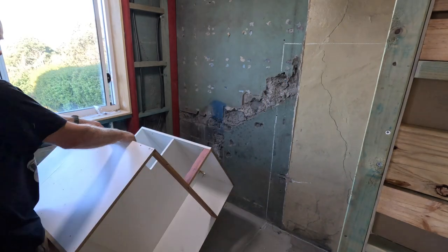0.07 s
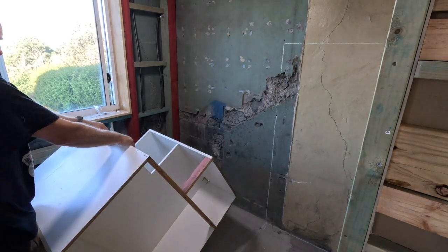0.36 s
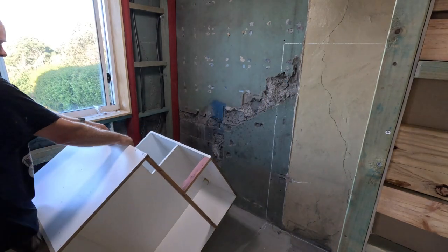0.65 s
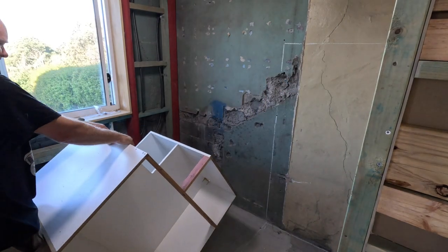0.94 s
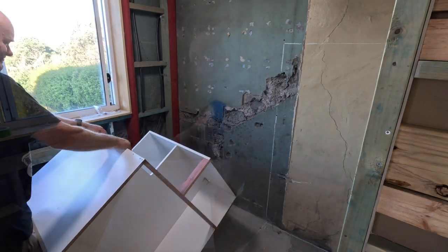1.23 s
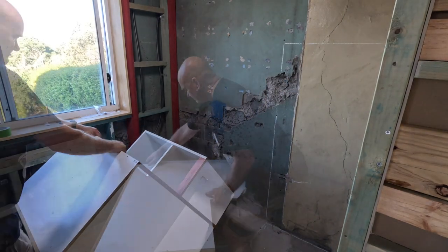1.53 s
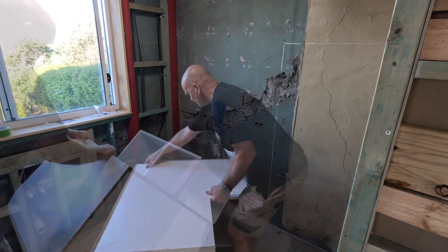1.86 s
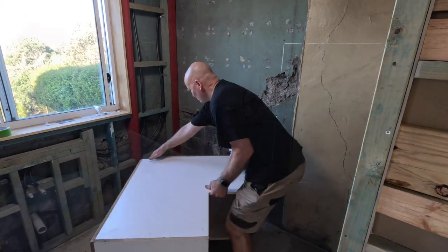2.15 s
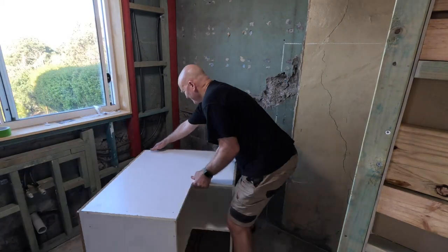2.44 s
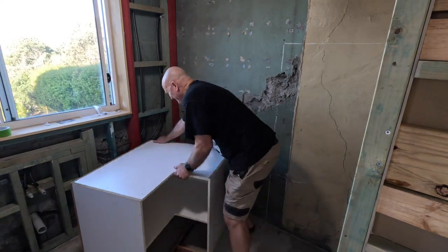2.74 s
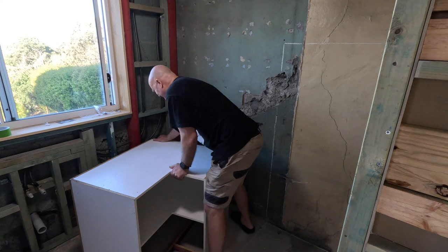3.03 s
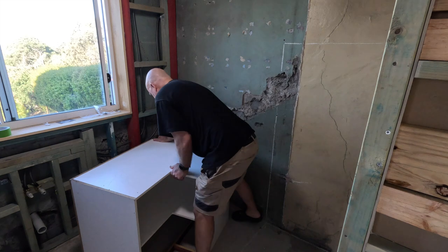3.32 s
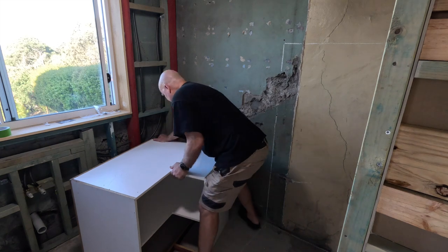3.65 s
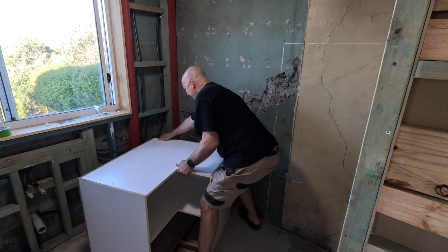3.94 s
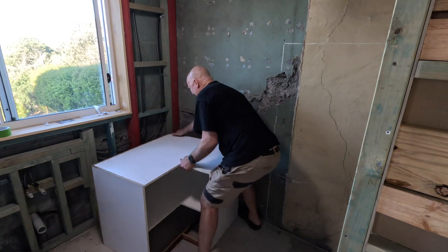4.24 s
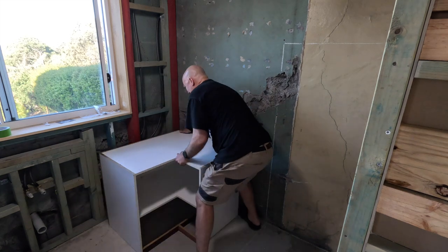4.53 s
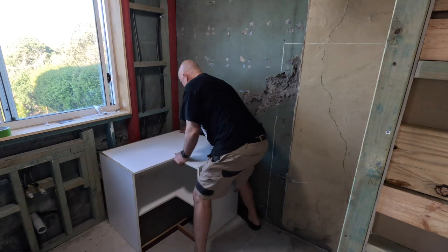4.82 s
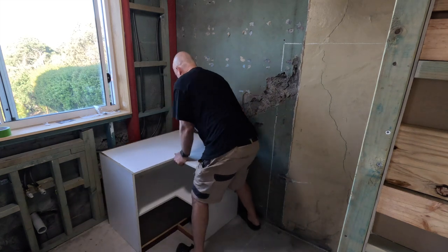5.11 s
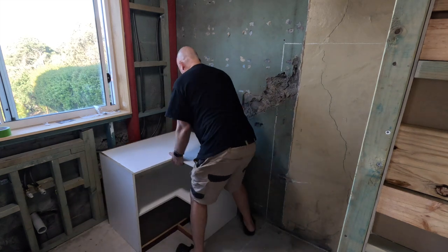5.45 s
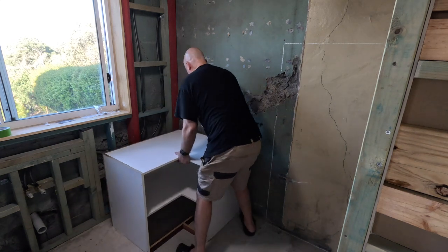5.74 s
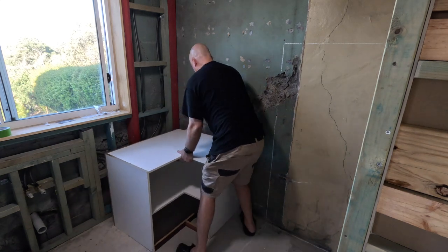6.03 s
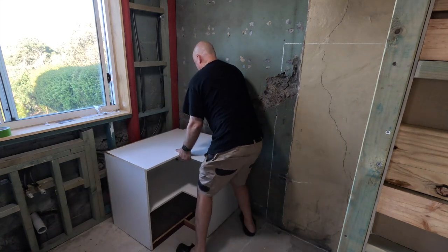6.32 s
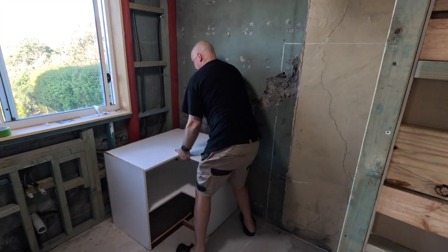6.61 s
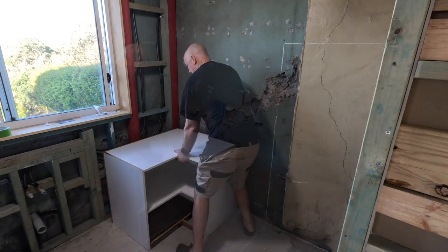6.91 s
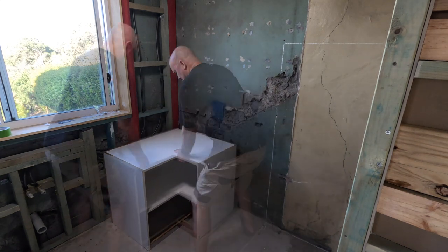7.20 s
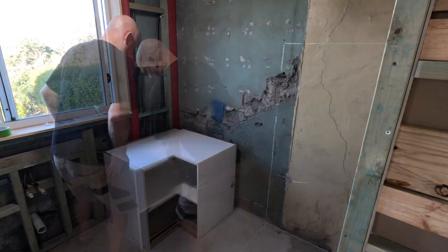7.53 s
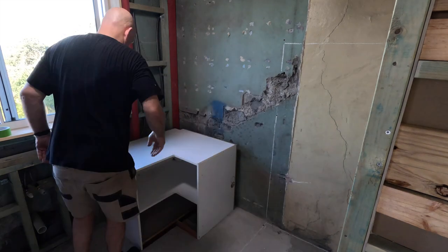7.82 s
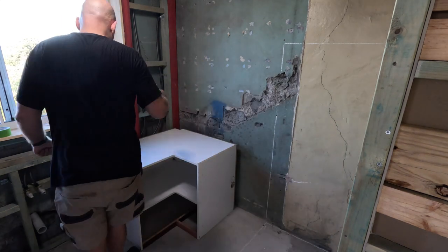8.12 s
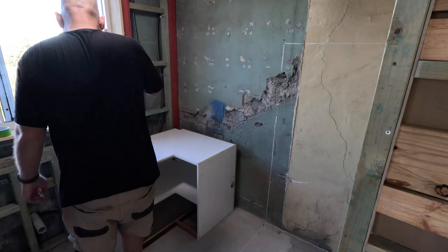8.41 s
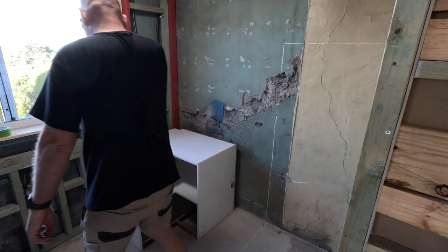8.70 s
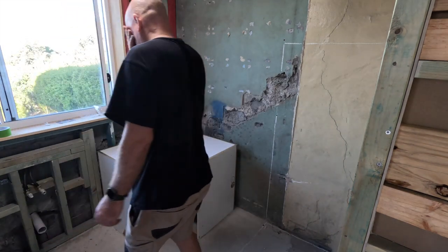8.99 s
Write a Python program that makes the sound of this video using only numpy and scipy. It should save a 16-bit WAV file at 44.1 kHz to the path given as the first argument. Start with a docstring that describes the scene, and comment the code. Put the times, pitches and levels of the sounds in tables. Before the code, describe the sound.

A chipboard cabinet bumps down onto a gritty floor after a loud shoe scrape. Four short shoves make it stick and slip with a low, droning judder and a rasp of crushed grit. It thumps against floor and wall, and nearby scuffing steps finish the sequence. The bare room adds a brief echo over quiet hiss and low rumble.

```python
"""In a bare room, over a faint rumble of air, shoes scuff on a dusty concrete floor.
Grit crunches and a chipboard cabinet is set down with a thud. It is shoved four times toward a corner:
its edges stick and slip, so the box judders, its panels drone and groan, and grit grinds underneath.
It bumps the floor and the wall. Finally the shoes scuff again and step close by."""
import sys
import numpy as np
from scipy import signal
from scipy.fft import rfft, irfft, next_fast_len
from scipy.io import wavfile
from scipy.ndimage import uniform_filter1d, minimum_filter1d, map_coordinates

SR = 44100
rng = np.random.default_rng(int(sys.argv[2]) if len(sys.argv) > 2 else 0)


def wav_out(sig):
    """Save sig, one row per channel (or a flat mono array), as 16-bit PCM at SR to the path in sys.argv[1]."""
    wavfile.write(sys.argv[1], SR, np.round(np.clip(np.atleast_2d(sig).T, -1, 1) * 32767).astype(np.int16))


N = 408366

# tone of the air's hiss: f/Hz, gain/dB
AIR_TONE = [(35, -49), (60, -12), (163, -6), (215, -11.5), (285, -11), (829, -18), (1630, -17), (1960, -22),
            (3340, -27.5), (7540, -34.5), (15500, -68.5)]
# tone of the low rumble: f/Hz, gain/dB
RUMBLE_TONE = [(12, -5), (23, -9.5), (31, 4), (40, -0.5), (52, -7.5), (66, -5.5), (110, -17.5),
               (160, -23.5), (270, -21.5), (500, -48.5), (900, -90)]
# how loud the rumble is: t/s, level/dB
RUMBLE_LEVEL = [(0.0, -42), (2.86, -44.5), (3.14, -60.5), (4.38, -42), (4.93, -59.5), (6.22, -43),
                (7.17, -53), (7.71, -38.5), (8.77, -37.5), (9.26, -38)]
# a sole slides: peak t/s, rise/s, fall/s, rub level/dB, fine grit over rub/dB, hollow f/Hz, hollow share
SCUFFS = [ (.05, 0.1442, 0.2707, -52, 12.5, 1292, 0.68), (0.221, 0.153, 0.11599, -21.5, -2, 1312, 0.52),
          (.63, 0.1516, 0.1922, -59, 1.5, 1299, 0.14), (1.06, 0.08595, 0.0931, -58, 4.5, 1298, 0.09),
          (1.199, 0.0862, 0.1478, -30.5, -0.5, 730, 0.36), (1.28, 0.1016, 0.10806, -30.5, 1.5, 1201, 0.1),
          (1.385, 0.03933, 0.07543, -37, 0, 1311, 0), (1.519, 0.07252, 0.08012, -38.5, 1.5, 1483, 0.35),
          (1.68, 0.0741, 0.1807, -45, -7, 1329, 0.1), (3.143, 0.04346, 0.08758, -41, -5.5, 869.6, 0.47),
          (3.28, 0.09125, 0.17484, -56, 2, 1000, 0.1), (3.56, 0.1856, 0.908, -55, -6, 1098, 0.29),
          (5.34, 0.12736, 0.13028, -44.5, -2.5, 1530, .4), (7.1, 0.1254, 0.66, -60.5, 6.5, 1300, 0.87),
          (7.3, 0.08305, 0.1394, -49, -4, 1210, 0.05), (7.54, 0.15, 0.04074, -48, -13, 1311, 0.06),
          (7.639, 0.2429, 0.2157, -50.5, 6.5, 1401, 0.25), (7.98, 0.5247, 0.4476, -50.5, -5.5, 1299, 0.09),
          (8.091, 0.06079, 0.2276, -36.5, -3, 1278, 0.73), (8.333, 0.05011, 0.11317, -28, 3, 893.5, 0.19),
          (8.431, 0.1014, 0.1797, -25.5, -10, 985.1, 0.81),
          (8.51, 0.0297, 0.08744, -34.5, -25.5, 876.4, 0.69),
          (8.776, 0.0554, 0.10838, -34, 2.5, 1237, 0.77), (9.02, 0.2441, 0.2569, -46.5, 4.5, 1203, 0.57),
          (9.089, 0.0351, 0.06385, -35, -6.5, 1104, 0.9), ]
# tone of dust under a sole: f/Hz, gain/dB
SOLE_TONE = [(120, -34.5), (200, -11.5), (240, -9.5), (298, -3), (371, -9.5), (506, -8), (641, -6),
             (742, -7.5), (1130, -2.5), (1590, -4), (2900, -5), (6130, -13), (7620, -12), (15500, -55)]
# an edge catches on grit: t/s, level/dB, centre f/Hz, width/Hz, length/s
CRUNCHES = [(0.725, -45.5, 1079, 1600, 0.08592), (1.375, -34, 3364, 3001, 0.01171),
            (1.675, -46, 1219, 160, 0.0379), (1.952, -35.5, 1599, 1500, 0.03),
            (2.099, -27.5, 2735, 1343, 0.15687), (2.32, -33.5, 2096, 2198, 0.02143),
            (2.459, -29, 1504, 1750, 0.02119), (3.118, -44.5, 2400, 2500, 0.04),
            (3.517, -52.5, 2928, 2530, 0.01141), (3.974, -30, 882, 299.4, 0.03223),
            (4.029, -38, 6990, 3500, 0.0693), (4.158, -31.5, 1240, 248.1, 0.02128),
            (4.873, -55.5, 2997, 2480, 0.03292), (5.017, -46, 1279, 802, 0.0334),
            (5.566, -41, 3246, 3509, 0.01441), (5.592, -40, 1687, 700, 0.0151),
            (5.813, -32.5, 2100, 1800, 0.05404), (5.911, -35, 4000, 4493, 0.091),
            (6.328, -39, 2000, 1483, 0.03), (6.723, -50.5, 3200, 5500, 0.08553),
            (7.051, -53.5, 2935, 3043, 0.02312), (7.274, -42.5, 1335, 450, 0.02529),
            (8.06, -33.5, 2392, 2444, 0.06056), (8.082, -27, 4646, 3533, 0.03504),
            (8.302, -31, 2995, 3497, 0.0353), (8.63, -51.5, 2917, 150, 0.0653),
            (8.728, -44, 3506, 2988, 0.03313), (8.945, -40, 2175, 1800, 0.02023)]
# dull blows on the box and heel falls: t/s, level/dB, hardness/dB
BUMPS = [(.731, -13.5, -5.5), (.755, -12.5, -27), (.789, -24, -24.5), (1.265, -18, -22), (1.284, -18, -0.5),
         (1.369, -28, 10.5), (1.504, -24.5, -8), (1.961, -24.5, -2.5), (2.226, -12.5, -5),
         (2.799, -17.5, -12.5), (5.018, -44, 11), (5.297, -33.5, -24), (5.51, -24, -5), (5.973, -8, -8.5),
         (5.998, -14, -0.5), (6.33, -25.5, 7), (6.699, -25.5, -32.5), (6.734, -12, -9), (6.758, -15, -17),
         (7.314, -33.5, 5), (7.54, -34.5, 6.5), (8.062, -30.5, 5)]
# the notes at which the box, its panels and the room's low boom ring: f/Hz, width/Hz, gain/dB
RINGING_NOTES = [(49.958, 19.435, -4.5), (66.475, 8.485, 4.5), (96.797, 4.878, -1), (103.39, 5.666, 2),
                 (146.89, 14.324, -3), (177.97, 11.007, -5), (206.22, 7.771, -3.5), (242.76, 16.323, -3),
                 (269.63, 11.19, -0.5), (314.41, 8.242, -7), (341.98, 5.417, -7.5), (372.24, 16.21, -8),
                 (412.19, 9.58, -11.5), (471.81, 8.67, -12.5), (555.4, 12.62, -15.5), (588.84, 14.56, -19),
                 (674.42, 19.41, -17), (779.97, 20.82, -17.5), (966.7, 86.02, -17.5),
                 (1088.9, 45.51, -13.5), (1419.4, 86.6, -24.5), (1503.5, 11, -20), (1780.2, 240, -23),
                 (2804.5, 41, -28), (3100.8, 87, -36.5)]
# one list for each shove: t/s, judder level/dB, drone level/dB, grinding level/dB
SHOVES = [
    [(1.91, -35.5, -44.5, -40.5), (1.94, -43.5, -41, -37), (1.97, -27, -26.5, -29),
     (2.014, -43, -31.5, -39), (2.07, -35, -32.5, -39), (2.118, -24.5, -23.5, -29),
     (2.174, -14.5, -25, -25), (2.26, -19.5, -29.5, -32.5), (2.298, -29, -34, -38),
     (2.364, -20.5, -30.5, -29.5), (2.42, -37.5, -37, -39.5)],
    [(2.48, -28, -28, -32.5), (2.494, -32, -31.5, -32), (2.528, -28, -27.5, -37.5), (2.55, -35, -32, -31),
     (2.628, -15, -29, -27.5), (2.692, -20.5, -30.5, -33), (2.77, -19.5, -27, -24.5),
     (2.808, -18.5, -31.5, -29), (2.844, -36, -27.5, -31.5), (2.884, -19.5, -31, -32),
     (2.92, -25, -33.5, -38.5)],
    [(3.76, -35.5, -43.5, -40.5), (3.782, -43, -39, -44), (3.812, -46, -36, -41.5),
     (3.866, -22.5, -35, -30), (3.92, -33, -29.5, -35.5), (3.98, -27, -29.5, -33.5),
     (4.006, -30.5, -25, -31), (4.262, -18, -32, -39), (4.602, -18, -28.5, -37), (4.654, -25, -37.5, -39),
     (4.68, -26.5, -38, -46)],
    [(5.6, -34, -37.5, -35), (5.626, -36, -37, -43), (5.686, -25.5, -37.5, -41), (5.86, -25, -25.5, -29),
     (5.886, -18, -23.5, -31.5), (5.914, -28.5, -26, -26), (6.008, -20.5, -25.5, -38),
     (6.18, -24.5, -45, -44.5), (6.27, -50, -43, -43), (6.344, -23.5, -38.5, -41.5), (6.36, -27, -45, -47)],
]
# how much the dust hisses in each shove, at the usual grinding level: level/dB
DUST_LEVELS = [-37.5, -39.5, -37, -36.5]
# how often the bottom edge slips: t/s, rate/Hz
SLIP_RATE = [(1.9, 82.43), (2.12, 98.94), (2.5, 90.206), (2.6, 69.64), (2.75, 54.31), (2.9, 83.6),
             (4.15, 73.464), (4.48, 70), (4.6, 71.332), (5.92, 98.917), (6.08, 66)]
# tone of grit crushed under the edge: f/Hz, gain/dB
GRIND_TONE = [(240, -46.5), (400, 8.5), (511, -6), (577, -3.5), (715, -8.5), (1020, -4.5), (1130, -5),
              (1240, -3), (1320, -5.5), (3510, -14.5), (4630, -20), (7210, -22), (15500, -59.5)]
# a panel groans: start t/s, length/s, f/Hz, level/dB, octave over the main note/dB
GROANS = [(1.929, 0.35645, 272, -27.5, -18), (2.119, 0.3646, 272.6, -35, -2.5),
          (2.171, 0.157, 312.8, -36.5, -21.5), (2.57, 0.3856, 295.9, -42.5, 4),
          (2.718, 0.11238, 255.8, -28, -20), (3.752, 0.073, 275, -36.5, -28.5),
          (3.88, 0.23, 265.4, -31.5, -27), (4.1, 0.25665, 275, -35.5, -20)]
# how long the echo takes to fade by 60 dB: f/Hz, time/s
ECHO_TIME = [(150, 0.0017), (500, 0.3233), (1100, 0.2858), (3000, 0.3838), (8000, 0.1964), (14000, 0.3094)]
# tone of the echo: f/Hz, gain/dB
ECHO_TONE = [(100, -3.5), (250, -10), (600, 3), (3000, 1.5), (12000, 3)]
# how wide the echo is: f/Hz, side over middle/dB
ECHO_WIDTH = [(100, -62.5), (300, -5.5), (640, -9), (1400, -5), (3000, -1.5), (5000, -8), (7500, -12),
              (12000, 4.5)]
# how far the sound leans left: f/Hz, left over right/dB
LEFT_LEAN = [(200, 0), (700, 1), (1300, 1.5), (2400, 1.2), (4400, .5), (8100, .8), (13000, 6)]


def amp(db):
    return 10 ** (np.asarray(db) / 20)


def unit(x):
    """Scale x to an average strength (rms) of 1."""
    return x / np.sqrt(np.mean(x ** 2) + 1e-20)


def even(x, size=3000):
    """Hold the strength of x near 1 all the way through."""
    return x / np.sqrt(np.abs(uniform_filter1d(x ** 2, size)) + 1e-6 * np.mean(x ** 2))


def along(points, hz):
    """Read a table by pitch, on a log scale."""
    f, v = np.transpose(points)
    return np.interp(np.log(hz + 1), np.log(f + 1), v)


def curve(rows):
    """One value per sample from rows of time and value."""
    return np.interp(np.arange(N) / SR, *np.transpose(rows))


def wobble(per_s):
    """A smooth curve through per_s random points a second."""
    return map_coordinates(rng.standard_normal(int(N * per_s / SR) + 4), [np.arange(N) * per_s / SR])


def filtered(x, response):
    """Multiply each frequency f in x by response(f)."""
    n = x.shape[-1]
    m = next_fast_len(n + SR // 2)
    return irfft(rfft(x, m) * response(np.fft.rfftfreq(m, 1 / SR)), m)[..., :n]


def toned(x, tone):
    """Shape x with a tone table."""
    return filtered(x, lambda f: amp(along(tone, f)))


def band(x, low_hz, high_hz, order=3):
    """Keep what lies between two frequencies."""
    return signal.sosfilt(signal.butter(order, [low_hz, high_hz], "band", fs=SR, output="sos"), x)


def resonance(f, hz, width):
    """The response of something that rings at hz."""
    return 1j * f * width / (hz * hz - f * f + 1j * f * width)


def air():
    """The room's air hisses quietly over a slowly swelling rumble."""
    both, left, right = toned(rng.standard_normal((3, N)), AIR_TONE)
    hiss = unit(both + .5 * np.array([left, right]))
    rumble = even(toned(rng.standard_normal(N), RUMBLE_TONE), size=9000)
    return amp(-57.5) * hiss + amp(curve(RUMBLE_LEVEL)) * rumble


def grit(per_s, spread_db, clump_db):
    """Grains break with tiny clicks of random size that come in clumps."""
    hits = rng.random(N) < per_s / SR
    clicks = hits * rng.standard_normal(N)
    return unit(clicks * amp(spread_db * rng.standard_normal(N) + clump_db * wobble(90)))


def scuffs():
    """How strong the rub and the fine grit are as each scuff swells and fades."""
    drop_db, roundness = 20, 1.2512  # drop over one rise or fall time; shape of the peak
    t = np.arange(N) / SR
    gains = np.zeros((2, N))
    for peak, rise, fall, db, fine_db, _, _ in SCUFFS:
        near = np.abs(t - peak) < 1
        away = np.maximum((peak - t[near]) / rise, (t[near] - peak) / fall)
        swell = amp(-drop_db * away ** roundness)
        gains[:, near] = np.hypot(gains[:, near], amp([[db], [db + fine_db]]) * swell)
    return gains


def shoes():
    """Soles rub over dust; the hollow under them colours the rub as the foot rolls."""
    def dust():
        return toned(grit(per_s=12000, spread_db=1.413, clump_db=1), SOLE_TONE)

    rubbing, fine = scuffs()
    times, *_, hollow_hz, shares = np.transpose(SCUFFS)
    pitch, share = curve(np.c_[times, hollow_hz]), curve(np.c_[times, shares])
    hollow = 0
    for hz in 630 * 2 ** (np.arange(5) / 3):  # blend five bands to follow the hollow's pitch
        nearness = np.sqrt(np.maximum(0, 1 - 3 * np.abs(np.log2(pitch / hz))))
        hollow += nearness * unit(filtered(dust(), lambda f: resonance(f, hz, width=499.3) ** 2))
    plain = unit(band(dust(), 158.94, 2066, order=2))
    rub = np.sqrt(share) * hollow + np.sqrt(1 - share) * plain
    return rubbing * rub + fine * unit(band(dust(), 1985.1, 20000, order=2))


def crunches():
    """Grit breaks in short bursts; a narrow band of pitch makes one creak or ping."""
    out, t = np.zeros(N + SR), np.arange(SR // 3) / SR
    for start, db, hz, width, length in CRUNCHES:
        grains = rng.standard_normal(len(t)) * amp(3.822 * rng.standard_normal(len(t)))
        burst = unit(filtered(grains, lambda f: resonance(f, hz, width) / (1 + (f / 8500) ** 8)))
        fade = np.exp(-(t / length) ** 2)
        out[round(start * SR):][:len(t)] += amp(db) * burst * fade
    return out[:N]


def ringing(force):
    """A force sets the box, its panels and the room's low boom ringing."""
    return filtered(force, lambda f: sum((-1) ** k * amp(db) * resonance(f, hz, width)
                                         for k, (hz, width, db) in enumerate(RINGING_NOTES)))


def bumps():
    """Padded blows rattle the joints and rock the box; harder ones bring out higher panel notes."""
    push_s, rattle_s, rocking_s = 0.0008499, 0.02649, 0.09828  # fading times
    out, t = np.zeros(N + SR), np.arange(SR // 2) / SR
    for start, db, hard_db in BUMPS:
        push = t / 0.0020257 * np.exp(-t / push_s)
        rattle = rng.standard_normal(len(t)) * np.exp(-t / rattle_s)
        rocking = band(rng.standard_normal(len(t)), 60.82, 145.43, order=2) * np.exp(-t / rocking_s)
        ring = ringing(push + 0.16254 * rattle + 0.16114 * rocking)
        thud, knock = band(ring, 52.6, 206.78, order=1), band(ring, 231.74, 3400, order=2)
        blow = thud / np.abs(thud).max() + amp(hard_db - 5.5) * knock / np.abs(knock).max()
        out[round(start * SR):][:len(t)] += amp(db) * blow
    return out[:N]


def shoves():
    """How strong judder, drone, grinding and hiss are; harder grinding makes more dust hiss."""
    grip_db_per_s, stop_db_per_s = 318, 160.5  # a shove takes hold quickly, then dies away
    usual_grinding_db, hiss_growth = -32, 1.0674
    t = np.arange(N) / SR
    gains = 0
    for rows, dust_db in zip(SHOVES, DUST_LEVELS):
        times, *levels = np.transpose(rows)
        judder, drone, grinding = [np.interp(t, times, level) for level in levels]
        hiss = dust_db + hiss_growth * (grinding - usual_grinding_db)
        before, after = np.maximum(0, times[0] - t), np.maximum(0, t - times[-1])
        fade_db = grip_db_per_s * before + stop_db_per_s * after
        gains = np.maximum(gains, amp(np.array([judder, drone, grinding, hiss]) - fade_db))
    return gains


def slips(scatter):
    """One pulse each time the edge lets go, at uneven gaps."""
    cycles = np.cumsum(curve(SLIP_RATE) * np.exp(scatter * wobble(70))) / SR
    return np.diff(np.floor(cycles), prepend=0) * amp(5.656 * wobble(45))


def squeaks(per_s, low_hz, high_hz, life_s):
    """Trapped grains briefly sing as they are dragged along."""
    out, t = np.zeros(N + SR), np.arange(SR // 8) / SR
    swell = t / life_s * np.exp(-(t / life_s) ** 2)
    for at, pitch, size, glide in rng.random((int(per_s * N / SR), 4)):
        hz = low_hz * (high_hz / low_hz) ** pitch * np.exp(4 * (glide - .5) * t)
        out[int(at * N):][:len(t)] += amp(4.56 * size) * swell * np.sin(2 * np.pi * np.cumsum(hz) / SR)
    return unit(out[:N])


def sliding():
    """Slips shake the box; grit crushed under the edge rings the panels, squeaks and hisses."""
    judder, drone, grinding, hiss = shoves()
    pulses = slips(scatter=.12)
    boom = even(band(ringing(pulses), 47.68, 129.78))
    shaking = unit(pulses) + grit(per_s=2500, spread_db=0.863, clump_db=0.998)
    panels = even(band(ringing(shaking), 196.15, 574.75))
    # grit breaks most just after each slip
    after_slip = unit(signal.lfilter([1], [1, -np.exp(-1 / (0.0243 * SR))], np.sqrt(pulses)))
    force = (1 + .5 * after_slip) * grit(per_s=3500, spread_db=0.6667, clump_db=1.7)
    crush = toned(force, GRIND_TONE)
    ring = unit(band(ringing(force), 547.14, 3383))
    squeal = squeaks(per_s=60, low_hz=755.04, high_hz=1890.9, life_s=0.017317)
    rasp = 0.8936 * unit(band(crush, 546.05, 2359)) + 0.2847 * ring + 0.3954 * squeal
    dust = unit(band(crush, 2153.1, 15000))
    return judder * boom + drone * panels + grinding * rasp + hiss * dust


def groans():
    """A panel falls in step with the slipping edge and sings a wavering note with its octave."""
    waver, flutter_db = 0.013092, 3.6248  # how unsteady pitch and level are
    out = np.zeros(N + SR)
    for start, length, hz, db, octave_db in GROANS:
        size = round(length * SR)
        phase = 2 * np.pi * np.cumsum(hz * (1 + waver * wobble(41.312)[:size])) / SR
        note = np.sqrt(2) * (np.sin(phase) + amp(octave_db) * np.sin(2 * phase))
        swell = np.sqrt(np.hanning(size)) * amp(db + flutter_db * wobble(29.74)[:size])
        out[round(start * SR):][:size] += swell * note
    return out[:N]


def room(x, count=90):
    """Bare walls add a dense echo that keeps changing as the sources move; its bass stays centred."""
    direct_db, echo_gain, delay_s = -1.2837, 0.47868, .002
    hz, t, noise = signal.stft(rng.standard_normal((count, 2, SR // 3)), SR, nperseg=256)
    fade = amp(-60 * t / along(ECHO_TIME, hz)[:, None])
    _, tails = signal.istft(noise * fade, SR, nperseg=256)
    echo, hop = np.zeros((2, N + 2 * SR)), N // (count - 1) + 1
    for k, tail in enumerate(tails):  # each overlapping piece of sound gets its own echo
        n = np.arange(max(0, (k - 1) * hop), min(N, (k + 1) * hop))
        piece = x[n] * np.cos(np.pi / 2 * (n / hop - k))
        answer = signal.fftconvolve(piece[None], tail / np.linalg.norm(tail[0]), axes=1)
        echo[:, n[0] + round(delay_s * SR):][:, :answer.shape[1]] += echo_gain * answer
    middle, side = toned(echo[:, :N], ECHO_TONE)
    side = toned(side, ECHO_WIDTH)
    return amp(direct_db) * x + np.array([middle + side, middle - side])


def scene():
    """Shoes and cabinet sound in the room, a little to the left, over the air."""
    sound = room(shoes() + crunches() + bumps() + sliding() + groans())
    return filtered(sound, lambda f: amp([along(LEFT_LEAN, f) / 2, -along(LEFT_LEAN, f) / 2])) + air()


def record(dry):
    """A limiter turns down the loudest peaks, and the highest treble is cut off."""
    ceiling, top_hz = .42, 15720
    needed = np.minimum(1, ceiling / (np.abs(dry).max(0) + 1e-9))
    gain = uniform_filter1d(minimum_filter1d(needed, size=1400), size=700)
    return filtered(dry * gain, lambda f: f < top_hz)


dry = scene()
out = record(dry)
wav_out(out)
```